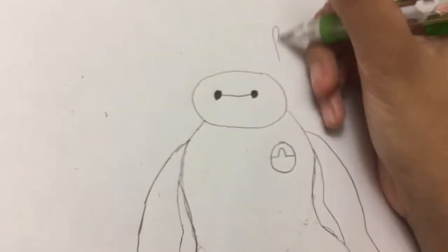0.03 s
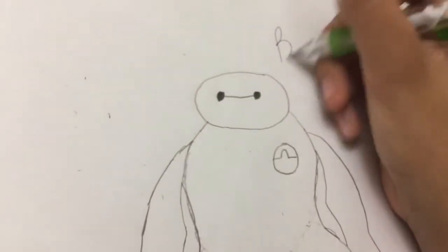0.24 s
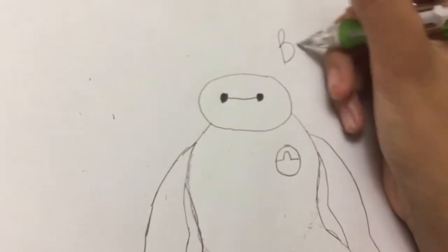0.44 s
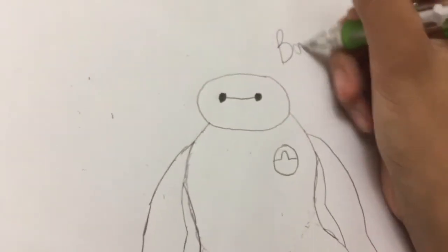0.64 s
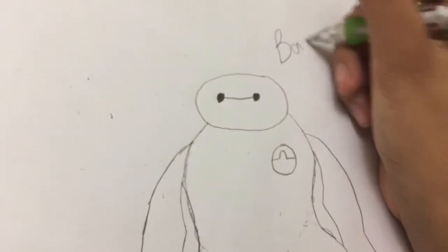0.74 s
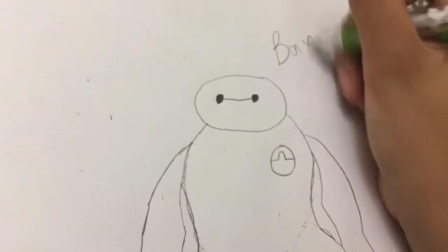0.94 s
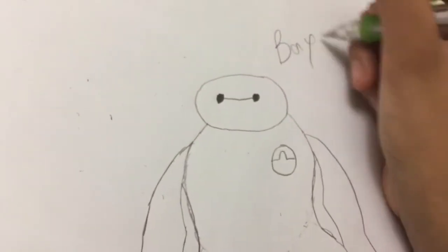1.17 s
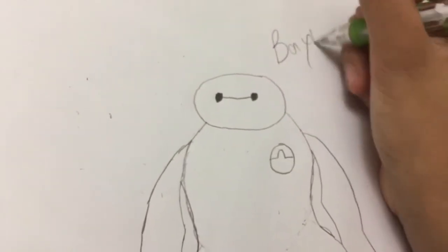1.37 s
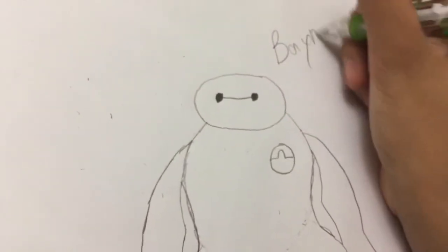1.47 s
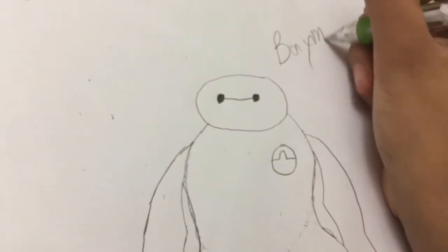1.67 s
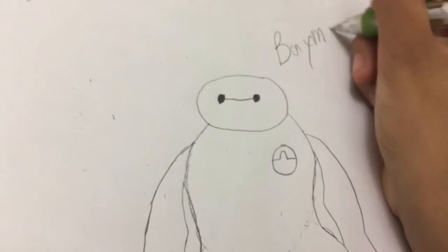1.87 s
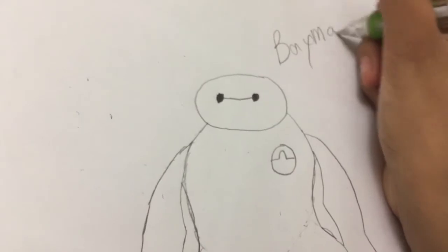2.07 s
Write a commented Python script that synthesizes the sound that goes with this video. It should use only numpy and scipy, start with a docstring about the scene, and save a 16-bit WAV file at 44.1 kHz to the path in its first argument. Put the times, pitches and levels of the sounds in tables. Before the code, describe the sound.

Close, mono pencil writing in a quiet indoor room. After a soft brush of the hand across the sheet come uneven taps and brief low, grainy strokes resonating in the desk, then a small click far off.

```python
"""A hand slides over paper first, then a pencil writes small letters on the sheet.
The paper lies on a hollow desk, close to a mono microphone, in a quiet room; a distant click ends it.
Each landing excites decaying modes of the desk; tip ticks and click are short bands of noise.
The drag is coloured, flickering noise, and random bumps of the grain make the desk top murmur.
The sliding hand and the room are coloured noise too."""
import sys
import numpy as np
from scipy import signal
from scipy.fft import rfft, irfft
from scipy.io import wavfile
from scipy.ndimage import uniform_filter1d

SR = 44100
rng = np.random.default_rng(int(sys.argv[2]) if len(sys.argv) > 2 else 0)


def persist_wave(psi):
    """Save psi, clipped to +-1, as 16-bit WAV."""
    counts = np.round(np.clip(psi, -1, 1) * 32767).astype(np.int16)
    wavfile.write(sys.argv[1], SR, np.atleast_2d(counts).T)


def nominal_scale(level):
    """Amplitude ratio for a level in decibels (scalar or array-like)."""
    x = np.asarray(level, float) / 20
    return 10 ** x


N = 92962  # samples, about 2.1 s


def evened(x):
    """Scales a signal to an rms of 1."""
    return x / np.sqrt(np.mean(x ** 2) + 1e-20)


def curve(table, count):
    """Column count of a time table, at every sample."""
    rows = np.array(table)
    return np.interp(np.arange(N) / SR, rows[:, 0], rows[:, count])


def add(mix, s, sound):
    """Lays a sound into the mix from s seconds on, cut off at the end."""
    part = mix[round(s * SR):][:len(sound)]
    part += sound[:len(part)]


def resonance_db(hz, peaks):
    """Sum of bell-shaped boosts in dB, one for each (f, width, level)."""
    return sum(db / (1 + (2 * (hz - f) / width) ** 2) for f, width, db in peaks)


def hiss(colour, peaks, patchy_db, flicker_db):
    """Random short-time spectra with a colour, resonances, drifting patches and wide flicker; rms 1."""
    frames = N // 64 + 8
    real, imag, patches = np.moveaxis(rng.standard_normal((frames, 129, 3)), 2, 0)
    patches = uniform_filter1d(patches, 24, axis=0)  # drift over time
    patches = evened(uniform_filter1d(patches, 4, axis=1))  # spread over frequency
    flicker = evened(uniform_filter1d(rng.standard_normal(frames), 3))[:, None]
    spectra = (real + 1j * imag) * nominal_scale(patchy_db * patches + flicker_db * flicker)
    white = signal.istft(spectra.T, nperseg=256, noverlap=192)[1][:N]

    hz = np.fft.rfftfreq(N, 1 / SR)
    f, db = np.transpose(colour)
    shape_db = np.interp(np.log(hz + 1), np.log(f), db, left=-90, right=-90)
    shape_db = shape_db + resonance_db(hz, peaks)
    return evened(irfft(rfft(white) * nominal_scale(shape_db), N))


RADIATE_HZ = 148.4  # the desk top radiates poorly below this


def ring(modes, contact_s, tilt_db=None):
    """Decaying modes answer one push of about contact_s and radiate through a high-pass; peak 1."""
    t = np.arange(SR // 3) / SR
    tilt_db = np.zeros(len(modes)) if tilt_db is None else tilt_db
    sound = np.zeros(len(t))
    for (hz, db, t60), tilt in zip(modes, tilt_db):
        sound += nominal_scale(db + tilt - 60 * t / t60) * np.sin(2 * np.pi * hz * t)
    push = np.exp(-.5 * ((t[:400] - 2 * contact_s) / (contact_s / 2)) ** 2)
    pushed = signal.fftconvolve(sound, push)[:len(t)]
    radiation = signal.butter(3, RADIATE_HZ, 'high', fs=SR, output='sos')
    out = signal.sosfilt(radiation, pushed)
    return out / abs(out).max()


# landings and turns of the tip on the desk: (t/s, thud peak level/dB, woody clack level/dB re thud)
KNOCKS = [(0.225, -41, -38), (.32, -41, -34), (0.352, -46.5, -48), (0.486, -40, -24), (.639, -45, -21),
          (.749, -63.5, 1.5), (0.8316, -26.5, -14), (.973, -42, -3.5), (1.193, -60, -22),
          (1.303, -23.5, -15), (1.446, -42.5, -8), (1.561, -50, -15), (1.618, -40.5, -4.5),
          (1.666, -45.5, -22), (1.725, -56, -8.5), (1.9136, -26.5, -14)]
# low modes of the desk top, before radiation: (f/Hz, level/dB, t60/s)
DESK_MODES = [(62.6, 5.5, 0.42), (95, 9.5, 0.033), (128, -4.5, 0.12), (185.8, -8, 0.2), (209, -3.5, 0.2),
              (258, 2, .12), (313, 3.5, 0.023), (314.5, 3, 0.11), (363.3, 13, 0.093), (434, -1, 0.05),
              (430, -29, 0.11), (581, -6, 0.18)]
# upper modes, the woody part, before radiation: (f/Hz, level/dB, t60/s)
WOOD_MODES = [(744, -4.5, 0.094), (1024, 8.5, 0.025), (1071, -10.5, 0.031), (1218, 5, 0.018),
              (1413, -6, 0.023), (1596, -17, 0.13), (1996, -3, 0.045), (2307, -2, 0.033),
              (2930, -39, 0.098), (2966, -16, 0.12)]
CLACK_S = 0.000094  # contact time of the clack
CHATTER_S = .0008  # the tip chatters as it lands: decay to 1/e
SCATTER_DB, SCATTER_T60 = -25.5, 0.26  # the wood scatters it: level against the chatter, decay in s


def knocks():
    """Each landing clacks roughly in the wood, then thuds in the desk top."""
    push_s, clack_lead_s = 0.00098, 0.0016  # contact time of the thud; the clack comes before it
    mode_spread_db = 1.8  # each landing place weighs the modes differently
    out, clack, t = np.zeros(N), ring(WOOD_MODES, CLACK_S), np.arange(8192) / SR
    rough = np.exp(-t / CHATTER_S) + nominal_scale(SCATTER_DB - 60 * t / SCATTER_T60)
    for s, db, clack_db in KNOCKS:
        drive = rng.standard_normal(8192) * rough
        woody = signal.fftconvolve(drive / np.linalg.norm(drive), clack)
        add(out, s, nominal_scale(db + clack_db) * woody)
        tilt_db = mode_spread_db * rng.standard_normal(len(DESK_MODES))
        add(out, s + clack_lead_s, nominal_scale(db) * ring(DESK_MODES, push_s, tilt_db))
    return out


# dry ticks of lead and paper at the tip; the last row is a distant click from elsewhere:
# (t/s, peak level/dB, centre f/Hz, length/s)
TICKS_AND_CLICK = [(.4688, -54, 8000, .002), (.743, -58, 4000, .003), (.7492, -43, 7000, .0035),
                   (.7497, -52, 2400, .005), (.8205, -53, 9000, .002), (.833, -60, 6000, .004),
                   (1.1119, -54, 12000, .002), (1.1952, -55, 13000, .003), (1.2935, -50, 9100, .003),
                   (1.304, -54, 5000, .004), (1.445, -60, 3500, .004), (1.619, -58, 4000, .003),
                   (1.824, -68, 11500, .002), (1.84, -66, 12600, .002), (1.8996, -50, 8000, .002),
                   (1.912, -57, 6000, .004), (2.1048, -49, 2900, .004)]
# resonances of lead and barrel: (f/Hz, width/Hz, level/dB)
BARREL = [(2200, 750, -0.5), (3284, 600, 11.5), (4650, 740, 6.5), (5830, 270, 1.5), (7290, 1160, 6),
          (8370, 190, 6.5)]


def ticks_and_click():
    """Tip ticks and the distant click: noisy snaps in a band, same resonances, with a faint tail."""
    tail_db, tail_t60, spread_octaves = -22.5, 0.081, 0.83
    out, t, hz = np.zeros(N), np.arange(4096) / SR, np.fft.rfftfreq(4096, 1 / SR)
    resonances = nominal_scale(0.97 * resonance_db(hz, BARREL))  # slightly weaker than in the hiss
    for s, db, centre_hz, length in TICKS_AND_CLICK:
        band = np.exp(-.5 * (np.log2((hz + 1) / centre_hz) / spread_octaves) ** 2)
        noise = irfft(rfft(rng.standard_normal(4096)) * band * resonances)
        u = t / max(length, 3e-4)
        envelope = 3 * u * np.exp(-3 * u + 1)  # peaks at a third of the length
        snap = (envelope + nominal_scale(tail_db - 60 * t / tail_t60)) * noise
        add(out, s, nominal_scale(db) * snap / abs(snap).max())
    return out


# strokes of the tip over the sheet: (t/s, length/s, hiss level/dB, low murmur level/dB,
# woody rasp level/dB, bright sheen level/dB)
STROKES = [(0.191, 0.076, -70.5, -46.5, -70.5, -87), (0.257, 0.12, -72, -50, -70.5, -83),
           (0.477, 0.073, -78.5, -54, -87, -88), (0.537, 0.097, -73.5, -57.5, -79.5, -84),
           (0.614, 0.08, -70, -54, -68, -86), (0.694, 0.053, -70.5, -55.5, -78, -86),
           (0.858, 0.073, -75.5, -53, -85, -87), (0.914, 0.063, -80, -55.5, -92, -80),
           (0.951, 0.046, -79, -53, -67, -83), (0.992, 0.083, -67, -43, -58, -71),
           (1.058, 0.085, -84, -65.5, -85.5, -87), (1.334, 0.08, -76.5, -55, -76, -84),
           (1.443, .07, -72, -56.5, -71.5, -69.5), (1.517, 0.078, -76, -58.5, -102, -82.5),
           (1.621, .065, -72.5, -62, -72, -70.5), (1.684, 0.082, -73.5, -55, -74, -84),
           (1.79, 0.013, -71.5, -85, -88, -102), (1.918, .09, -75, -56, -78, -78.5),
           (2.009, 0.12, -77.5, -65.5, -80, -87)]


def effort(count, arch):
    """A stroke speeds up, swells and stops: gain from one level column; arch rounds the flat top."""
    edge_s, stop_t60 = 0.0072, 0.027
    t, power = np.arange(N) / SR, np.zeros(N)
    for row in STROKES:
        start, length = row[:2]
        u = t - start
        rise = np.clip(u / edge_s, 0, 1)
        stop = nominal_scale(-60 * np.maximum(u - length + edge_s, 0) / stop_t60)
        round_top = np.sin(np.pi * np.clip(u / length, .15, .85)) ** arch
        power += (nominal_scale(row[count]) * rise * stop * round_top) ** 2
    return np.sqrt(power)


# colour of the lead on the fibres: (f/Hz, level/dB per Hz)
SCRATCH_COLOUR = [(880, -90), (1500, -34.5), (1770, 2), (2190, 4.5), (2660, -15.5), (3560, -9), (3770, -11),
                  (5620, -4), (11900, -3), (15300, -39.5)]
# bright top of a stroke: (f/Hz, level/dB per Hz)
SHEEN_COLOUR = [(5000, -28), (8500, 2), (9130, -24), (9990, -9.5), (10900, -20), (11900, 2), (15300, 0)]


def scratch():
    """Lead shearing off on the fibres hisses; some strokes gain a bright sheen."""
    grit = hiss(SCRATCH_COLOUR, BARREL, patchy_db=3, flicker_db=1.8)
    sheen = hiss(SHEEN_COLOUR, [(11900, 600, 3)], patchy_db=2.5, flicker_db=1.8)
    return effort(count=2, arch=0.77) * grit + effort(count=5, arch=1.0) * sheen


def murmur():
    """Paper grain bumps the tip at random and each bump rings the desk, low and woody."""
    bumps_per_s, bump_s = 510, 0.0015  # rate; contact time of one bump on the low modes
    body_arch = 1.28
    strength = nominal_scale(-0.5 * np.minimum(rng.exponential(1, N), 4))  # up to 2 dB weaker
    bumps = strength * (rng.random(N) < bumps_per_s / SR)
    bumps = evened(bumps * rng.choice([-1., 1.], N))
    low, woody = ring(DESK_MODES, bump_s), ring(WOOD_MODES, CLACK_S)
    out = np.zeros(N)
    for body, count in ((low, 3), (woody, 4)):
        pushes = bumps * effort(count, body_arch)
        out += signal.fftconvolve(pushes, body / np.linalg.norm(body))[:N]
    return out


# hand sliding over the sheet: (t/s, level/dB)
SLIDE = [(0.0, -46.5), (0.016, -51), (0.066, -48), (0.164, -53), (0.254, -74), (0.3, -71)]
# colour of the slide: (f/Hz, level/dB per Hz)
SLIDE_COLOUR = [(24, -28), (40, -40), (86, -0.5), (174, -6), (258, -13.5), (348, -5), (394, -18.5),
                (469, -20), (896, -35.5), (2310, -23), (3270, -27.5), (4740, -17), (9520, -22.5),
                (15300, -26)]
# sheet resonances under the hand: (f/Hz, width/Hz, level/dB)
SHEET = [(594, 120, 8.5), (1147, 330, 12), (2300, 560, 10.5), (4760, 400, 4.5), (5340, 250, 3.5),
         (6900, 200, 4), (8700, 250, 3), (9320, 120, 12.5)]


def slide():
    """The edge of the hand sweeps the sheet as coloured noise and comes to rest."""
    level = nominal_scale(curve(SLIDE + [(.45, -110)], count=1))
    return level * hiss(SLIDE_COLOUR, SHEET, patchy_db=1.5, flicker_db=.7)


# colour of the quiet room around the desk: (f/Hz, level/dB per Hz)
ROOM_COLOUR = [(18, -47), (30, -4), (108, 3.5), (890, -19), (1040, -24), (1900, -23.5), (2800, -20.5),
               (3190, -25.5), (4040, -29.5), (15300, -34.5)]


def room():
    """Quiet coloured noise with a slight flicker lies under everything."""
    return nominal_scale(-71.5) * hiss(ROOM_COLOUR, [], patchy_db=2.2, flicker_db=.6)


def scene():
    """Pencil, hand, distant click and room at the one microphone, alike on both channels."""
    mono = knocks() + ticks_and_click() + scratch() + murmur() + slide() + room()
    return np.tile(mono, (2, 1))


def top_cut(x):
    """Nothing passes above the cut-off."""
    return signal.sosfilt(signal.butter(12, 15420, fs=SR, output="sos"), x)


def record(dry):
    """Takes the microphone's two equal channels as the finished mix."""
    return top_cut(dry)


dry = scene()
out = record(dry)
persist_wave(out)
```